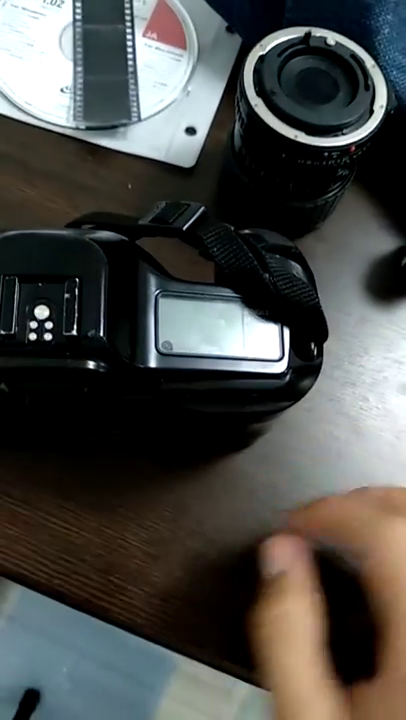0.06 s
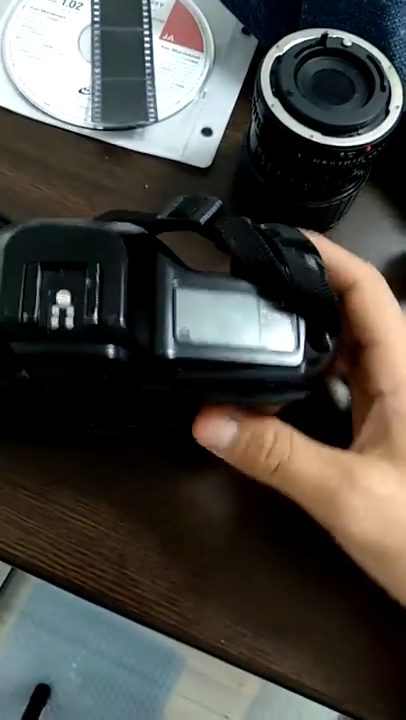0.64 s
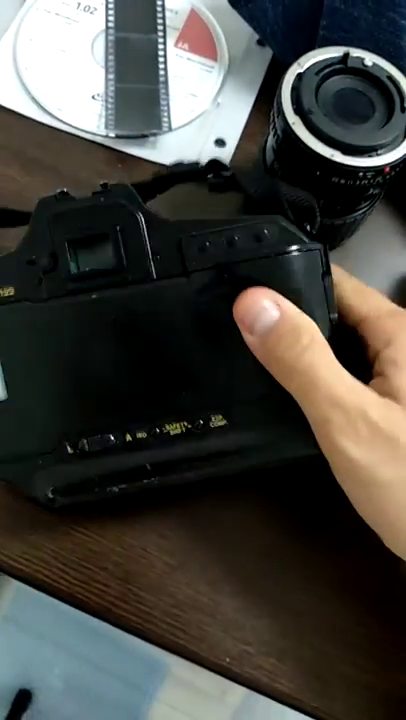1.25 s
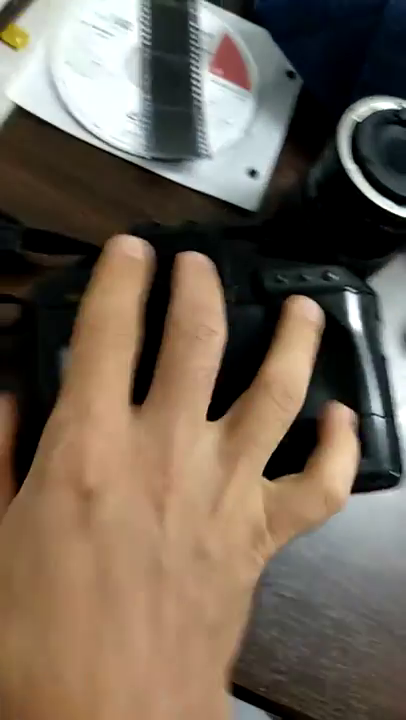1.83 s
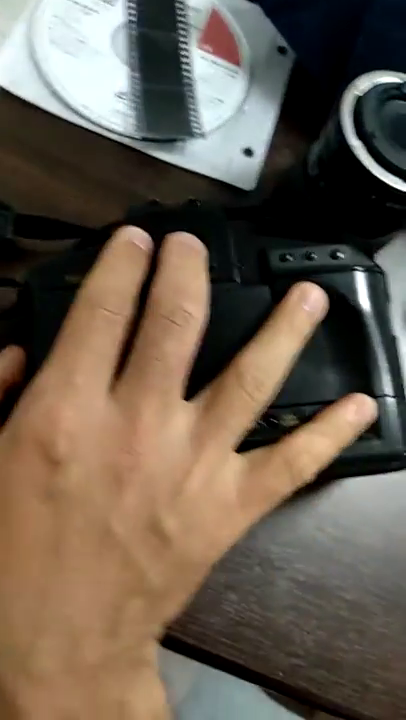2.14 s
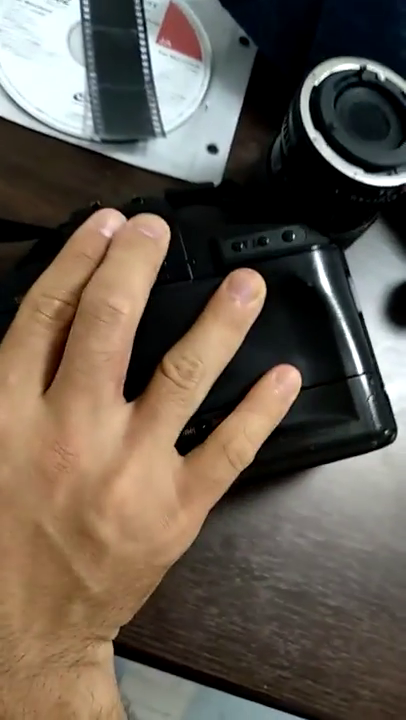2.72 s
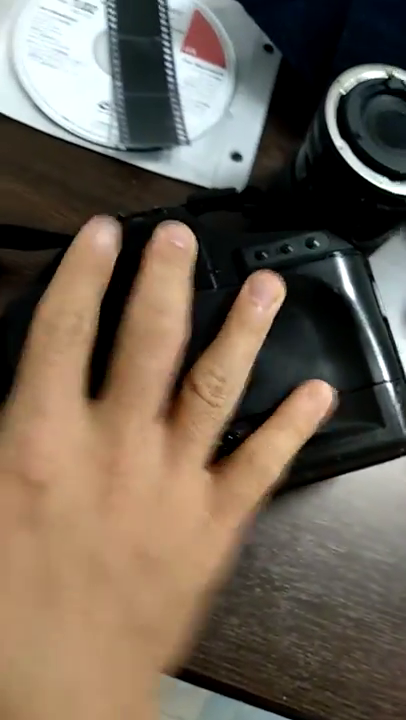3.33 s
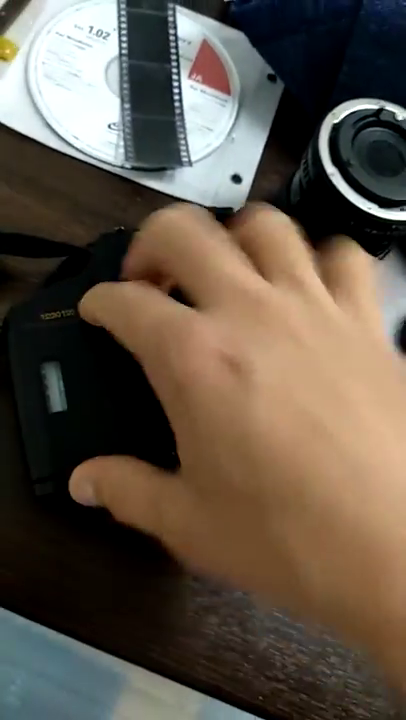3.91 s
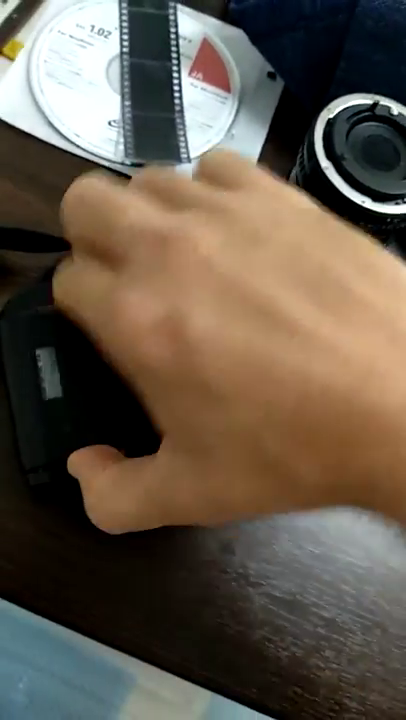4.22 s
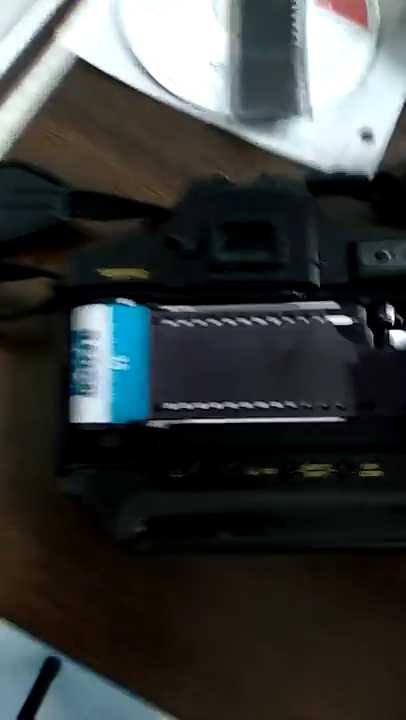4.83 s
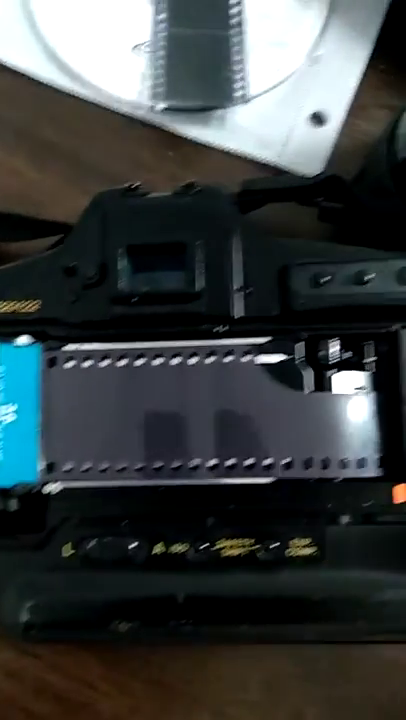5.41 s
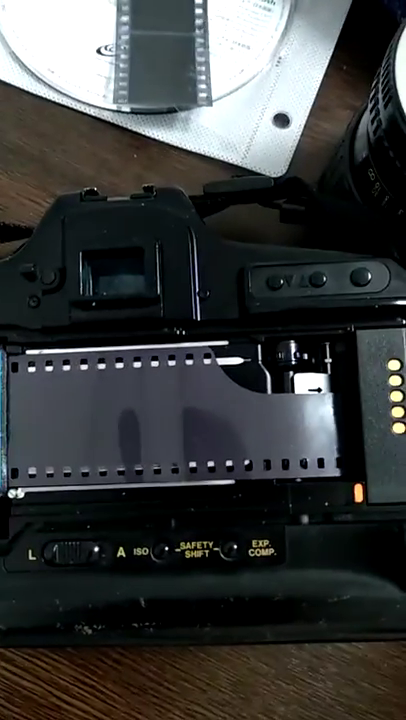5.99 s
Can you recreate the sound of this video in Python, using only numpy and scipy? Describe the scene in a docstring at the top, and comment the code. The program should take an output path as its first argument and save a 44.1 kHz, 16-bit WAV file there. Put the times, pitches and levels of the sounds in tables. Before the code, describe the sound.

A plastic film camera is handled on a wooden desk, close to the microphone in a small, quiet room. At first there is only a faint hiss cutting in and out. At about 0.8 seconds the body knocks on the desk, then drags briefly while fingers rub the shell. A cluster of hollow knocks and plastic clicks follows from 1.3 to 1.6 seconds as it is tipped over, the desk ringing slightly. From 2 to 3 seconds skin slides over the plastic with a soft, high whisper, with a light bump and a couple of clicks. Just after 3 seconds the latch snaps, the loudest sound, with a thump and a short rattle of loose parts. Smaller clicks follow. From 4 to 5.5 seconds the back door swings open with light ticks, swishes and gritty scrapes. Near 6 seconds all is still and the hiss drops out again.

```python
"""A plastic film camera is handled on a wooden desk in a small, quiet room, close to the microphone.
At first a faint hiss cuts in and out. Then fingers rub the shell, and the body knocks, clicks and
drags on the desk as it is tipped over. Skin slides over the fine grain with a high whisper. At three
seconds the latch of the back snaps and loose parts rattle. From four seconds the door is swung open
with small ticks and scrapes, and in the last still moments the hiss drops out again."""
import sys
import numpy as np
from scipy import signal
from scipy.fft import rfft, irfft, next_fast_len
from scipy.io import wavfile

SR = 44100
rng = np.random.default_rng(int(sys.argv[2]) if len(sys.argv) > 2 else 0)


def transcribe(signal):
    """Save signal, clipped to [-1, 1], as a 16-bit WAV file at the path in sys.argv[1]."""
    frames = np.atleast_2d(signal).T
    limited = np.clip(frames, -1, 1)
    pcm = np.round(limited * 32767).astype(np.int16)
    wavfile.write(sys.argv[1], SR, pcm)


N = 267066
T = np.arange(N) / SR


def from_db(db):
    """Turn decibels into a gain."""
    return 10 ** (np.asarray(db) / 20)


def rms_one(x):
    """Scale a signal to an average power of 1."""
    return x / np.sqrt(np.mean(x ** 2) + 1e-20)


def at_hz(points, hz, column=1):
    """Look up a table at any frequency, blending between its rows."""
    points = np.array(points)
    return np.interp(np.log(np.maximum(hz, 1)), np.log(points[:, 0]), points[:, column])


def drift(per_s):
    """A random wobble, about 1 in size."""
    knots = rng.standard_normal(int(T[-1] * per_s) + 2)
    return rms_one(np.interp(T * per_s, np.arange(len(knots)), knots))


def decay(t, rise_s, t60):
    """A quick rise, then a fade; t60 is the seconds it takes to fall by 60 dB."""
    return (1 - np.exp(-t / rise_s)) * from_db(-60 * t / t60)


def add(out, start_s, sound):
    """Mix a sound in at a given time."""
    start = round(start_s * SR)
    out[..., start:start + sound.shape[-1]] += sound[..., :N - start]


# how alike left and right are: f/Hz, likeness (1 = the same)
STEREO_LIKENESS = [(60, 0.73), (200, 0.93), (400, 0.59), (800, 0), (1600, 0.19), (16000, 0)]
def noise(spectrum, size=N):
    """Stereo noise with a given tone colour; the two sides are most alike in the bass."""
    padded = next_fast_len(size)
    hz = np.fft.rfftfreq(padded, 1 / SR)
    mid, side = rfft(rng.standard_normal((2, padded)))
    alike = np.clip(at_hz(STEREO_LIKENESS, hz), -.99, .99)
    both = np.sqrt(1 + alike) * mid + np.sqrt(1 - alike) * side * [[1], [-1]]
    return rms_one(irfft(both * from_db(at_hz(spectrum, hz)), padded)[:, :size])


# tone colour of the background: f/Hz, level/dB
AIR_COLOUR = [(20, -8.5), (45, -19), (65, -8), (85, 2.5), (110, -7.5), (200, -12), (400, -20.5),
              (800, -26.5), (3000, -34), (6000, -35), (10000, -31), (16000, -35.5)]
def still_air(level_db=-58):
    """The quiet room rumbles faintly and the microphone hisses."""
    return from_db(level_db) * noise(AIR_COLOUR)


# still spells in which the background drops out: from t/s, to t/s
GAPS = [(0, 0.322), (0.431, 0.748), (3.712, 3.728), (4.335, 4.375), (5.651, 5.822), (5.93, 6.018)]
# moments when it flickers back: from t/s, to t/s
FLICKERS = [(0, 0.022), (0.138, 0.157), (0.185, 0.201), (0.252, 0.273), (0.283, 0.295), (0.460, 0.485),
            (0.521, 0.545), (0.576, 0.588), (0.660, 0.678), (0.689, 0.718), (5.741, 5.762), (5.966, 5.987)]
def drop_out(x, split_hz=130, bass_db_per_s=500, treble_db=-32, treble_db_per_s=330):
    """In each gap the hiss vanishes at once and the bass fades after it; both return with a faint pop."""
    heard = np.ones(N, bool)
    for start, end in GAPS:
        heard[(T >= start) & (T < end)] = False
    for start, end in FLICKERS:
        heard[(T >= start) & (T < end)] = True
    gone_s = T - np.maximum.accumulate(T * heard)
    back_s = T - np.maximum.accumulate(T * ~heard)
    bass = signal.sosfiltfilt(signal.butter(4, split_hz, fs=SR, output="sos"), x)
    fading = bass * from_db(-bass_db_per_s * gone_s) + x * from_db(treble_db - treble_db_per_s * gone_s)
    pop = from_db(-1.5 - 60 * np.minimum(back_s / 0.016, 2))  # dies away in 16 ms
    return np.where(heard, x * (1 + pop), fading)


def speed(start, length, shape=0.38):
    """A hand speeds up to 1 and slows to rest; a shape under 1 keeps it fast for longer."""
    along = (T - start) / length
    moving = (along > 0) & (along < 1)
    out = np.zeros(N)
    out[moving] = np.sin(np.pi * along[moving]) ** shape
    return out


def strokes(rows):
    """Strength of a run of hand strokes: the faster, the louder."""
    return np.sqrt(sum((from_db(db) * speed(start, length)) ** 2 for start, length, db in rows))


def friction(spectrum, strength, rough_db, slips_per_s):
    """Rubbing noise whose strength jumps as the surfaces stick and slip."""
    return strength * rms_one(noise(spectrum) * from_db(rough_db * drift(slips_per_s)))


# tone colour of the rubbing: f/Hz, level/dB
RUB_COLOUR = [(100, -13), (200, -7), (350, -2), (550, -6.5), (800, -7.5), (1400, -11.5), (2400, -14.5),
              (4000, -21.5), (15000, -22)]
# shifts of the grip: t/s, length/s, level/dB
GRIP_SHIFTS = [(0.76, 0.32, -50), (1.05, 0.25, -50.5), (1.165, 0.038, -44), (1.22, 0.45, -50),
               (1.88, 0.83, -60), (2.2, 0.7, -58.5), (2.52, 0.065, -55.5), (2.92, 0.51, -57.5),
               (3.55, 0.79, -59), (4.36, 0.14, -54.5), (4.52, 0.26, -60), (4.94, 0.64, -58)]
def grip_rub(gain_db=-1.5):
    """The grip shifts and rubs on the shell."""
    return friction(RUB_COLOUR, from_db(gain_db) * strokes(GRIP_SHIFTS), rough_db=2.5, slips_per_s=48)


# the notes at which the desk rings: f/Hz, level/dB, t60/s
DESK_NOTES = [(84, -20, 0.5), (129.9, -10, 0.23), (152.2, -12, 0.25), (168.3, -13, 0.33),
              (248.5, -14.5, 0.19), (290.1, -15, 0.3), (367.6, -21, 0.22), (404, -18.5, 0.22),
              (472.2, -14.5, 0.24), (777, -25, 0.3), (843, -20.5, 0.24)]
def desk_hum(rub):
    """Steady rubbing makes the desk hum at its own notes."""
    push = rub.mean(axis=0) + 1e-18
    out = 0
    for hz, _, t60 in DESK_NOTES:
        r = from_db(-60 / (t60 * SR))  # share of the ring left after one sample
        feedback = [1, -2 * r * np.cos(2 * np.pi * hz / SR), r * r]
        out = out + signal.lfilter([(1 - r * r) / 2, 0, (r * r - 1) / 2], feedback, push)
    return out


# tone colour of the swishing: f/Hz, level/dB
SWISH_COLOUR = [(1500, -11.5), (3000, -3), (4500, -1.5), (6000, 2), (7800, 1.5), (10500, 4.5), (13000, -1),
                (16000, -5.5)]
# light strokes of the skin: t/s, length/s, level/dB
SKIN_STROKES = [(0.76, 0.3, -58), (1.04, 0.15, -53), (1.18, 1, -63), (1.96, 0.35, -54), (2.28, 0.79, -62.5),
                (3.72, 0.16, -59.5), (4.04, 0.23, -57.5), (4.39, 0.195, -55), (4.725, 0.074, -53.5),
                (4.875, 0.069, -58.5), (4.94, 0.59, -64.5)]
def swishes_and_ticks(swish_db=-1.0, tick_db=3.0, opening_s=4.0):
    """Skin swishes over the plastic; once the back is being opened, nails and door tick along."""
    strength = strokes(SKIN_STROKES)
    swish = friction(SWISH_COLOUR, from_db(swish_db) * strength, rough_db=2.0, slips_per_s=100)
    ticks = grains(from_db(tick_db) * strength * (T > opening_s), per_s=63, t60=0.0098)
    return swish + ticks


# tone colour of the dragging: f/Hz, level/dB
DRAG_COLOUR = [(50, -20), (90, -10), (140, 6), (180, 1), (250, -7.5), (350, -25), (600, -20), (1500, -31.5)]
# moves across the desk: t/s, length/s, level/dB
BODY_MOVES = [(0.77, 0.26, -47), (1.05, 0.2, -42), (4.38, 1.6, -64)]
def body_drag():
    """The body drags on the desk as it is tipped, and faintly while its back is opened."""
    return friction(DRAG_COLOUR, strokes(BODY_MOVES), rough_db=0.5, slips_per_s=42)


# the body lands or the latch jolts it: t/s, thump level/dB, f/Hz, swell/cycles, desk level/dB
BODY_KNOCKS = [(0.802, -23.5, 175, 1.02, -22.5), (1.321, -34, 123, 1.3, -38),
               (1.3608, -21, 193, 0.26, -26.5), (1.3681, -20, 234.5, 1.5, -19), (1.390, -24.5, 300, 1, -48),
               (1.503, -24.5, 228, 1.4, -24.5), (1.540, -23, 144, 0.9, -20.5),
               (1.591, -38.5, 80.5, 2.4, -45), (2.738, -34.5, 134, 1.06, -36.5),
               (3.0524, -11, 370, 0.55, -19.5), (3.083, -34.5, 85.5, 2.3, -45), (3.959, -50, 205, 0.8, -42),
               (4.603, -50.5, 173, 0.72, -55), (5.452, -46, 232, 1.6, -45)]
def knocks(desk_db=3.0, desk_rise_s=0.0015, reach_octaves=1.16, uneven_db=2.6):
    """Each thump swells and dies quickly; the desk rings on, most at the notes near the thump's pitch."""
    out, t = np.zeros(N), T[:SR // 2]
    for start, db, hz, swell_cycles, shake_db in BODY_KNOCKS:
        age = hz * t / swell_cycles
        blow = from_db(db) * np.sin(2 * np.pi * hz * t) * (age * np.exp(1 - age)) ** 2
        for note_hz, note_db, t60 in DESK_NOTES:
            reach = 1 / (1 + (np.log2(note_hz / hz) / reach_octaves) ** 2)
            strength = reach * from_db(shake_db + desk_db + note_db + uneven_db * rng.standard_normal())
            blow += strength * np.sin(2 * np.pi * note_hz * t) * decay(t, desk_rise_s, t60)
        add(out, start, blow)
    return np.array([out, out])


# tone colour of a plastic crack: f/Hz, level/dB
CRACK_COLOUR = [(200, -9), (700, -5), (1500, -6.5), (2400, -4.5), (3400, -6), (4800, -4.5), (6200, -3.5),
                (8500, -0.5), (10500, -1.5), (13000, -4.5), (16000, -15)]
# hard parts click: t/s, crack level/dB, brightness/(dB per octave), ring f/Hz, ring level/dB,
# left minus right/dB
PART_CLICKS = [(0.802, -35, -4, 535, -25.5, 2), (0.826, -35.5, 4, 4200, -43.5, 6),
               (1.318, -32.5, -4, 1120, -37, 0), (1.3178, -50, -15, 2530, -33, 3),
               (1.3619, -26.5, -1.5, 4184, -24.5, 0.5), (1.363, -30, -1, 2280, -31, 8),
               (1.367, -31, -8, 770, -26, -7), (1.503, -44, -3.5, 860, -40.5, -3),
               (1.5397, -30, -1.5, 1180, -33, -1.5), (2.742, -58, -12, 710, -40, -10),
               (2.9092, -32, 0, 4350, -37, -5.5), (2.947, -36.5, -2, 1100, -34, -10),
               (3.0514, -30, -3.5, 1530, -44, 17), (3.0542, -13.5, 0.5, 6130, -22.5, -2),
               (3.0632, -27, -13, 8950, -34, 9), (3.2174, -29, 1.5, 1660, -26, 1.5),
               (3.2602, -36.5, 4.5, 1700, -44, 0), (3.4595, -44.5, -3, 676, -40.5, -7),
               (3.54, -36.5, -0.5, 915, -32.5, -8.5), (3.9318, -44.5, -4, 780, -40.5, -8),
               (3.949, -45, 15, 860, -41.5, -19), (3.9568, -31.5, 1, 2060, -49, 10),
               (4.5085, -46, -1, 9500, -47, -6), (4.5868, -42.5, 1, 8530, -38, -6),
               (4.602, -40.5, -1.5, 1003, -43, -15), (4.805, -42, 5, 9000, -40.5, -9),
               (5.035, -41, 0, 8000, -51, 3), (5.2708, -42.5, 0, 4650, -50, -4),
               (5.309, -38.5, 3, 9740, -43, -8), (5.437, -35, 3, 9900, -35, 9.5),
               (5.4408, -36.5, 3.5, 9880, -38, -12.5)]
def clicks(crack_db=3.5, ring_db=0.5, ring_room_db=-13, alike=0.84):
    """The shell cracks and a part rings; returns the direct sound and the share sent into the room."""
    direct, to_room, t = np.zeros((2, N)), np.zeros((2, N)), T[:SR // 16]
    for start, db, tilt_db, hz, part_db, pan_db in PART_CLICKS:
        lag = rng.integers(-6, 7)  # each part lies at its own angle to the microphone's two openings
        crack = noise([(f, level + tilt_db * np.log2(f)) for f, level in CRACK_COLOUR], size=len(t))
        crack[1] = alike * np.roll(crack[0], lag) + np.sqrt(1 - alike ** 2) * crack[1]
        crack *= from_db(db + crack_db) * decay(t, rise_s=0.00022, t60=0.021)
        ring = from_db(part_db + ring_db) * part_ring(hz, t)
        add(direct, start, (crack + ring) * from_db([[pan_db / 2], [-pan_db / 2]]))
        room_db = -3 - 0.5 * np.log2(hz / 1000)  # smaller, higher parts carry less far
        add(to_room, start, (crack + ring * from_db(ring_room_db)) * from_db(room_db))
    return direct, to_room


def part_ring(hz, t, width_octaves=0.12, hollow_below_hz=3500, hollow_db=4.0, count=48):
    """A part rings with a crowd of notes around its pitch; in large hollow parts one stands out."""
    octaves = (2 * (np.arange(count) + rng.random(count)) / count - 1)[:, None]
    fall = decay(t, rise_s=0.33 / hz, t60=0.019)
    notes = np.sin(2 * np.pi * (hz * 2 ** octaves * t + rng.random((count, 1))))
    crowd = (notes / np.hypot(1, octaves / width_octaves)).sum(axis=0)
    hollow = from_db(hollow_db) * max(1 - hz / hollow_below_hz, 0)
    ring = rms_one(crowd * fall) + hollow * rms_one(np.sin(2 * np.pi * hz * t) * fall)
    return rms_one(ring) * np.sqrt(np.mean(fall ** 2))


# how the room's echo fades: f/Hz, t60/s, level/dB
ROOM_ECHO = [(79.2, 0.63, -14.5), (250, 0.26, 3.5), (690, 0.34, 6), (1960, 0.26, 5.5), (6000, 0.38, 0),
             (9800, 0.26, 2), (16000, 0.11, 1.5)]
def room(x, first_echo_s=0.0036, build_s=0.0017, tail_db=-0.5):
    """Many small echoes build up within milliseconds and die away, each octave at its own pace."""
    t, response = T[:SR * 3 // 4], 0
    for hz in 45 * 2 ** np.arange(.5, 9):
        edges = [hz / np.sqrt(2), min(hz * np.sqrt(2), SR * .45)]
        white = noise([(hz, 0)], size=len(t))
        band = signal.sosfilt(signal.butter(2, edges, "band", fs=SR, output="sos"), white)
        fall = decay(np.maximum(t - first_echo_s, 0), build_s, at_hz(ROOM_ECHO, hz))
        gain = from_db(at_hz(ROOM_ECHO, hz, column=2) + tail_db)
        response = response + gain * band * fall / np.sqrt(np.sum(fall ** 2))
    return signal.fftconvolve(x, response, axes=1)[:, :N]


# a fingertip sings in a narrow band, the flat hand in a wide one:
# t/s, length/s, full-speed f/Hz, level/dB, width/Hz
SKIN_SLIDES = [(0.977, 0.26, 10830, -62.5, 380), (1.053, 0.093, 6160, -59.5, 409),
               (1.285, 0.38, 11160, -62, 316), (1.935, 0.38, 8040, -57, 994),
               (1.944, 0.39, 8440, -57.5, 2596), (1.982, 0.36, 10350, -63, 1890),
               (2.278, 0.32, 7010, -61.5, 2460), (2.61, 0.14, 7260, -62.5, 2476),
               (2.78, 0.1, 6820, -63, 2410), (4.068, 0.3, 9400, -64, 300),
               (4.328, 0.25, 9370, -65.5, 298.6)]
def singing_slides(sag=0.37, waver=0.018, upper_db=-10, catch_db=1.0):
    """Skin passes over tiny ridges and gives a band of hiss whose pitch follows the hand's speed."""
    out = np.zeros((2, N))
    for start, length, top_hz, db, width_hz in SKIN_SLIDES:
        pace = speed(start, length)
        on = pace > 0
        hz = top_hz * (1 - sag * (1 - pace) + waver * drift(per_s=15))  # a hand is never quite steady
        phase = 2 * np.pi * np.cumsum(hz[on]) / SR
        hiss = np.zeros((2, N))
        for turn, gain in [(phase, 1), (phase * 4 / 3, from_db(upper_db))]:  # finer grain sings higher
            for side in hiss:
                band = drift(width_hz)[on] * np.sin(turn) + drift(width_hz)[on] * np.cos(turn)
                side[on] += gain * band
        grip = rms_one(from_db(catch_db * drift(per_s=110)))  # the skin catches and lets go
        out += hiss * from_db(db) * grip * pace
    return out


def grains(strength, per_s, t60, spread_db=-1.5):
    """Tiny plastic contacts of uneven size, at random moments."""
    hits = rng.random(N) < per_s / SR
    sizes = from_db(spread_db * np.minimum(rng.exponential(1, N), 2))
    envelope = signal.lfilter([1], [1, -from_db(-60 / (t60 * SR))], hits * sizes + 1e-18)
    return strength * envelope * noise(CRACK_COLOUR)


# short scrapes: t/s, length/s, level/dB
EDGE_SCRAPES = [(1.08, 0.092, -50.5), (4.405, 0.023, -47), (4.485, 0.034, -46), (4.555, 0.113, -52.5),
                (4.73, 0.048, -54)]
def edge_scrapes():
    """Edges of the shell and the door scrape in gritty runs of tiny contacts."""
    return grains(strokes(EDGE_SCRAPES), per_s=180, t60=0.0099, spread_db=2.0)


def door_rattle(start_s=3.058, level_db=-38):
    """After the loud snap, loose parts of the door shiver and settle."""
    shiver = decay(np.maximum(T - start_s, 0), rise_s=0.00083, t60=0.63)
    return grains(from_db(level_db) * shiver, per_s=1310, t60=0.014)


def scene(boom_db=-7.0, boom_below_hz=290):
    """Mix the knocks and clicks, their echo, the rattle, the handling and the still air."""
    thumps, rattle = knocks(), door_rattle()
    snaps, to_room = clicks()
    boom = signal.sosfilt(signal.butter(2, boom_below_hz, fs=SR, output="sos"), thumps)
    echo = room(from_db(boom_db) * boom + to_room)  # only the bass of a knock fills the room
    rub = grip_rub()
    handling = rub + desk_hum(rub) + body_drag() + swishes_and_ticks() + edge_scrapes()
    return thumps + snaps + rattle + echo + handling + singing_slides() + still_air()


# the microphone's left opening hears more treble, the right more of the very top:
# f/Hz, left minus right/dB
MIC_BALANCE = [(130, -1), (280, 1), (550, 0.5), (2000, 1.5), (4000, 0.5), (8000, 5.5), (12000, -2)]
def record(dry, low_cut_hz=68, high_cut_hz=16000):
    """The two openings colour the sound, the background drops out, and deep bass and top are cut."""
    size = next_fast_len(N + SR // 10)
    lean_db = at_hz(MIC_BALANCE, np.fft.rfftfreq(size, 1 / SR))
    x = irfft(rfft(dry, size) * from_db([lean_db / 2, -lean_db / 2]), size)[:, :N]
    x = signal.sosfilt(signal.butter(4, low_cut_hz, "high", fs=SR, output="sos"), drop_out(x))
    return signal.sosfilt(signal.ellip(10, .1, 80, high_cut_hz, fs=SR, output="sos"), x)


dry = scene()
out = record(dry)
transcribe(out)
```